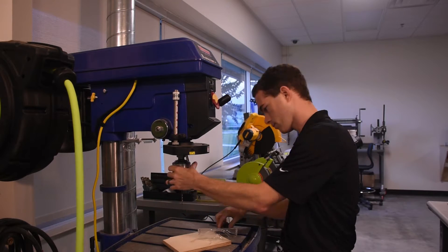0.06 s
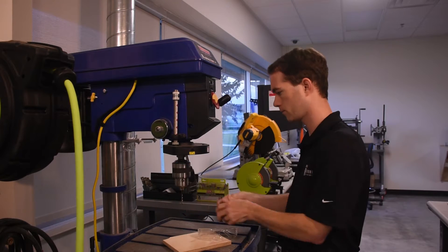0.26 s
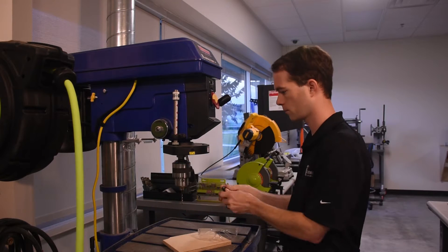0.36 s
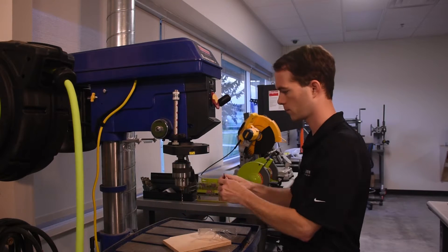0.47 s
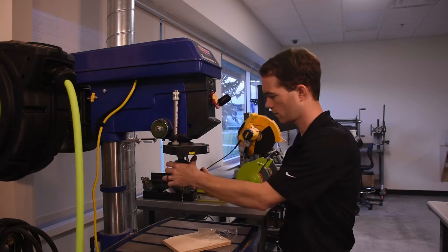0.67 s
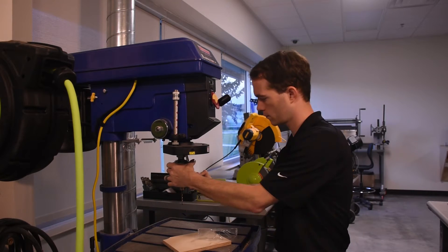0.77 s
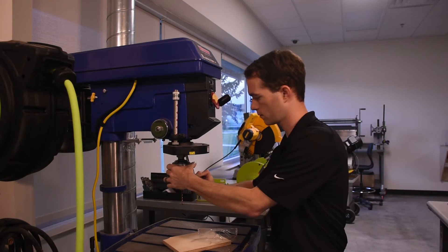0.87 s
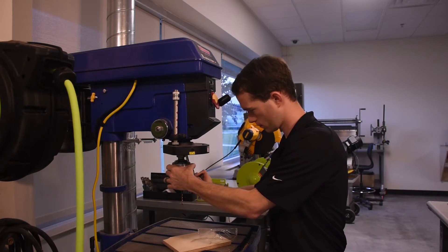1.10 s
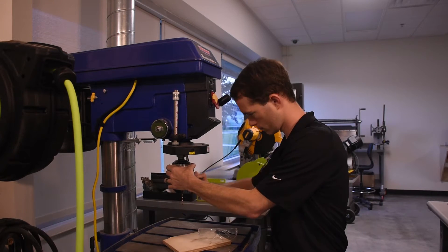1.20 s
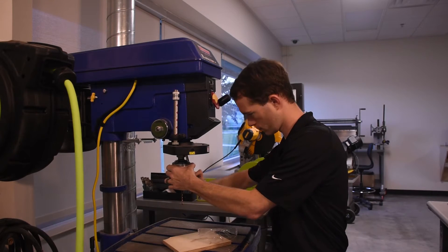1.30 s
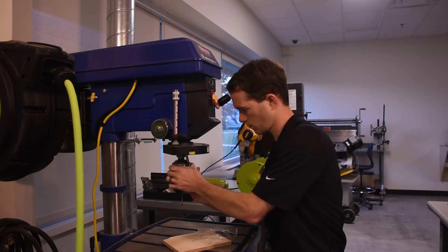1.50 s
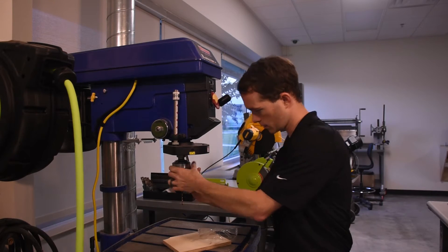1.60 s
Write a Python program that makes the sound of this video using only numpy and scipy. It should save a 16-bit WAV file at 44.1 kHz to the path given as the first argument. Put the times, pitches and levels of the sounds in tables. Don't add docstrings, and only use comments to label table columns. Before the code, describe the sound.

A steel key works in a drill press chuck. Soft finger rubbing near 0.1 s leads to two bright clanks at 0.13 and 0.15 s, chattering until damped around 0.25 s. Faint handling follows, a small knock at 0.72 s and dull slips near 0.9 s. Sharp ratcheting tooth knocks ring the heavy chuck at 1.18, 1.23, 1.29 and 1.32 s, then a dull knock at 1.53 s over quiet room hiss.

```python
import sys
import numpy as np
from scipy import signal
from scipy.io import wavfile

SR = 44100
rng = np.random.default_rng(int(sys.argv[2]) if len(sys.argv) > 2 else 0)


def amplitude_ratio(level_db):
    exponent = np.asarray(level_db, float) / 20
    return 10 ** exponent


def pcm_store(signal):
    levels = np.round(np.clip(np.atleast_2d(signal), -1, 1) * 32767)
    wavfile.write(sys.argv[1], SR, levels.astype(np.int16).T)


N = 72765

EDGES = 30 * 2 ** np.arange(0, 9.3, 1 / 3)
# pitch_hz [Hz], density_db [dB per Hz]
TOOTH_CRACK = [(180, -62), (300, -16.5), (1660, -1), (7020, -14), (8580, -13.5), (9810, -8), (11000, -16),
               (15200, -10), (16500, -20)]
# crack_t60 [s at 2 kHz], shortening [power of pitch], tail_db [dB], tail_t60 [s],
# tail_shortening [power], snap_db [dB], build_up [s], ring_db [dB]
TOOTH_DECAY = (0.0273, 0.71, -17.5, 0.2468, 0.87, 8.5, -0.24, -14)


def at_hz(points, hz):
    points_hz, points_db = np.transpose(points)
    return np.interp(np.log(hz), np.log(points_hz), points_db)


def band(x, low, high):
    return signal.sosfilt(signal.butter(2, [low, high], "band", fs=SR, output="sos"), x)


def high_pass(x, order, hz):
    return signal.sosfilt(signal.butter(order, hz, "high", fs=SR, output="sos"), x)


def fade(x, t60):
    return signal.lfilter([1], [1, -amplitude_ratio(-60 / (t60 * SR))], x + 1e-18)


def ring(x, hz, t60):
    radius = amplitude_ratio(-60 / (t60 * SR))
    angle = 2 * np.pi * hz / SR
    return signal.lfilter([0, np.sin(angle)], [1, -2 * radius * np.cos(angle), radius * radius], x)


def clicks(start_s, level_db):
    out = np.zeros(N)
    np.add.at(out, (np.asarray(start_s) * SR).astype(int), amplitude_ratio(level_db))
    return out


def strike(events, crack, modes, decay):
    start_s, level_db, tilt_db, ring_db = np.transpose(events)
    t60, power, tail_db, tail_t60, tail_power, snap_db, build_s, body_db = decay
    white = rng.standard_normal((2, N))
    out = np.zeros(N)
    low, high = EDGES[9:-1], EDGES[10:]
    centre_hz = np.sqrt(low * high)
    colour_db = at_hz(crack, centre_hz)
    colour_db = colour_db - 10 * np.log10(np.sum(amplitude_ratio(2 * colour_db) * (high - low)) * 2 / SR)
    for k, hz in enumerate(centre_hz):
        brightness_db = tilt_db * np.log2(max(hz, 900) / 2000)
        hits = clicks(start_s, level_db - 10.0 + colour_db[k] + brightness_db)
        body = fade(hits, t60 * (hz / 2000) ** -power)
        tail = amplitude_ratio(tail_db) * fade(hits, tail_t60 * (hz / 2000) ** -tail_power)
        snap = amplitude_ratio(snap_db) * hits * (-1) ** (k // 2)
        out += band(white[k % 2] * (body + tail) + snap, low[k], high[k])

    luck_db = rng.normal(0, 1.67, (len(start_s), len(modes)))
    for k, (hz, mode_db, ring_t60, *own_build) in enumerate(modes):
        rise_s = max(own_build[-1] if own_build else build_s, .001)
        touch = clicks(start_s, level_db + ring_db + body_db + mode_db + luck_db[:, k]) + 1e-18
        swell = ring(ring(touch, hz, rise_s), hz, ring_t60)
        out += swell * 2 * np.log(1000) / (rise_s * SR)
    return out


def run_of(curve, per_s, crack_db, tilt_db, ring_db, count):
    curve_s, curve_db = np.transpose(curve)
    start_s = np.cumsum(rng.exponential(1 / per_s, count)) + curve_s[0]
    start_s = np.clip(start_s, 0, (N - 1) / SR)
    luck_db = 3 * rng.normal(0, 1, count)
    level_db = np.interp(start_s, curve_s, curve_db, right=curve_db[-1] - 20) + crack_db + luck_db
    return np.c_[start_s, level_db, np.full(count, tilt_db), np.full(count, ring_db)]


def shop():
    # pitch_hz [Hz], level_db [dB]
    air_colour = [(59, -60), (100, -30.5), (230, -19), (338, -0.5), (552, 2), (642, -13), (1790, -22.5),
                  (3540, -16), (14500, -19.5), (16500, -20)]
    air_db, tone_db = -68, -79
    white = rng.standard_normal((2, N))
    air = np.zeros(N)
    for k, (low, high) in enumerate(zip(EDGES, EDGES[1:])):
        air += amplitude_ratio(at_hz(air_colour, np.sqrt(low * high))) * band(white[k % 2], low, high)
    air = signal.sosfilt(signal.cheby2(10, 30, 16000, fs=SR, output="sos"), air)
    tone = ring(white[0], hz=763, t60=.25)
    return amplitude_ratio(air_db) * air / air.std() + amplitude_ratio(tone_db) * tone / tone.std()


def hand_grip():
    # start_s [s], level_db [peak dB], brightness_db [dB per octave], ring_db [dB]
    releases = [(.0414, -50, 5.5, -3), (.0598, -62, 3, 5), (.0676, -41, -4, 7), (.0763, -40, 1, -1),
                (.0838, -39, -2, 1.5), (.0858, -36.5, -0.5, 4), (.0872, -52, 3, -10), (.0958, -42.5, 2, 2),
                (.0988, -53.5, 2, 17), (.4, -56.5, 7.5, -10), (.511, -49.5, 1.5, 0), (.539, -54, -5, 7.5),
                (.549, -52, -10, 3), (.567, -54, -1, 4.5), (.588, -52, -6, -7), (.598, -56, -1, 4)]
    # start_s [s], level_db [dB]
    rubbing = [
        (.082, -63),
        (.088, -41),
        (.105, -41.5),
        (.128, -49),
    ]
    # pitch_hz [Hz], level_db [dB], t60 [s]
    hand_modes = [(480, -1, 0.0073), (803, 5.5, 0.007), (1410, 0, 0.003), (3000, -7.5, 0.0063),
                  (4800, -9, 0.0066)]
    # pitch_hz [Hz], density_db [dB per Hz]
    touch_crack = [(250, -28), (450, -22), (850, 0), (1800, -5), (3000, -5.5), (4700, -5.5), (6500, -38),
                   (16500, -20)]
    touch_decay = (0.008, 0.2, -28, 0.05, 0.1, 10, 0.001, -6)
    rubs = run_of(rubbing, per_s=500, crack_db=-5.5, tilt_db=.5, ring_db=-18., count=40)
    return strike(np.r_[releases, rubs], touch_crack, hand_modes, touch_decay)


def contact_pings():
    # start_s [s], pitch_hz [Hz], level_db [peak dB], t60 [s]
    ping_rows = [(.0415, 3000, -55, 0.0073), (.0878, 324, -32, 0.041), (.0881, 628, -45.5, 0.063),
                 (.045, 600, -55, 0.025), (.1336, 15100, -17, 0.03), (.1335, 3450, -26, 0.042),
                 (.1335, 2620, -36, .035), (.1335, 1345, -32.5, 0.045), (.1523, 15500, -23, .022),
                 (.1522, 5150, -26, 0.066), (.1522, 11260, -35, 0.052), (.2142, 5150, -39.5, 0.048),
                 (.2142, 3420, -37, 0.066), (.2142, 8140, -42, 0.036), (.252, 1010, -50.5, 0.054),
                 (.252, 4000, -52, 0.083), (.7125, 1335, -45.5, 0.026), (.714, 3970, -54, 0.018),
                 (.7235, 2350, -51, 0.091), (.7245, 1872, -39, 0.037), (.739, 1698, -57, 0.36),
                 (.745, 2396, -56, 0.22), (1.153, 803, -46.5, 0.077), (1.138, 1910, -56, 0.013),
                 (1.138, 3870, -40, 0.017), (1.138, 14500, -33, .008), (1.179, 1910, -25, 0.031),
                 (1.179, 10000, -27, 0.0086), (1.179, 6110, -29, 0.0066), (1.179, 1100, -63, 0.11),
                 (1.231, 1354, -26.5, 0.033), (1.231, 9970, -22, .012), (1.231, 14800, -17.5, .012),
                 (1.233, 2116, -36.5, 0.057), (1.2855, 1280, -34.5, 0.034), (1.29, 9900, -37, 0.0063),
                 (1.3245, 1878, -30, 0.038), (1.3245, 2310, -23, 0.021), (1.3245, 2970, -30.5, 0.027),
                 (1.33, 618.4, -33.5, .15), (1.345, 889, -45.5, 0.26), (1.36, 2020, -60, 0.35),
                 (1.562, 534, -52.5, 0.23), (1.575, 517, -53.5, 0.21), (.735, 790, -45, 0.17),
                 (.95, 1370, -51, 0.057), (.16, 3090, -32.5, 0.12), (.163, 2734, -30.5, 0.062),
                 (1.534, 1854, -46, .03), (1.534, 3270, -48, 0.022), (1.345, 2376, -50, 0.22)]
    out = np.zeros(N)
    for start_s, hz, level_db, t60 in ping_rows:
        touch = clicks([start_s], level_db - 4.5) + 1e-18
        detune_hz = 111 * (hz / 1e4) ** 2
        out += ring(touch, hz - detune_hz, t60) + ring(touch, hz + detune_hz, t60)
    return out


def column(knocks):
    middle_hz, split_hz, t60, column_db = 530.3, 5.3, 0.39, -20.5
    start_s, level_db, _, ring_db = np.transpose(knocks)
    touch = clicks(start_s, level_db + ring_db + column_db) + 1e-18
    upper = ring(touch, middle_hz + split_hz / 2, t60)
    lower = ring(touch, middle_hz - split_hz / 2, t60 * 0.68)
    return upper - lower


def pinion():
    # start_s [s], level_db [peak dB], brightness_db [dB per octave], ring_db [dB]
    slips = [
        (.886, -42.5, -1.3, -7.5),
        (.914, -45, -5.5, 4),
        (.94, -55, -9, 10),
        (.95, -62, 2, 8),
        (1.035, -64, -8, 6),
        (1.075, -53.5, -10, 9.5),
    ]
    # start_s [s], level_db [dB]
    fumble = [(.002, -72), (.25, -61.5), (.33, -72.5), (.45, -82.5), (.69, -75.5), (.78, -65.5),
              (.85, -67.5), (.955, -74), (.99, -105), (1.12, -71), (1.36, -68), (1.48, -83.5),
              (1.53, -60.5), (1.6, -96)]
    # pitch_hz [Hz], level_db [dB], t60 [s]
    pinion_modes = [(1240, -9, 0.134), (1323, -4, 0.11), (1425, 8, 0.045), (1507, 3, 0.085),
                    (1783, -5.5, 0.081), (3040, -18, 0.034)]
    shifts = run_of(fumble, per_s=700, crack_db=-3.6, tilt_db=-2.5, ring_db=-9., count=1150)
    return strike(np.r_[slips, shifts], TOOTH_CRACK, pinion_modes, TOOTH_DECAY)


def key():
    # start_s [s], level_db [peak dB], brightness_db [dB per octave], ring_db [dB]
    clanks = [
        (.1268, -41.5, 3.5, 0),
        (.1333, -11, -0.5, -3),
        (.1521, -16.5, 3, -2),
    ]
    # start_s [s], level_db [dB]
    chatter = [(.158, -27.5), (.172, -37.5), (.185, -53), (.2, -44), (.21, -30), (.225, -31.5), (.235, -52),
               (.25, -54), (.262, -53), (.275, -64.5), (.34, -63)]
    # pitch_hz [Hz], level_db [dB], t60 [s]
    key_modes = [(1057, -15, 0.11), (1587, -5.5, 0.2), (1778, -10, 0.096), (2017, -8.5, .08),
                 (2440, -12.5, 0.078), (2740, -4.5, .1), (2775, -6, 0.099), (3090, -9, 0.11),
                 (3360, -10, 0.057), (3607, -16.5, 0.15), (4290, -20, 0.18), (5250, -12.5, 0.078),
                 (6460, -22, .03), (5520, -13, .04)]
    # pitch_hz [Hz], density_db [dB per Hz]
    clank_crack = [(300, -44), (800, -21), (1150, -8), (2700, -2), (4610, -8), (5280, -3.5), (9650, -12.5),
                   (14000, -9), (15400, -7), (16500, -12)]
    clank_decay = (0.06, 0.5, -18, 0.1536, 0.2, -17, 0.18, -10.5)
    held_s, damping_db_per_s = 0.24, 250
    rattles = run_of(chatter, per_s=600, crack_db=-10.5, tilt_db=-3, ring_db=11, count=130)
    out = strike(np.r_[clanks, rattles], clank_crack, key_modes, clank_decay)
    out = high_pass(out, 2, 820)
    return out * amplitude_ratio(-damping_db_per_s * np.maximum(np.arange(N) / SR - held_s, 0))


def chuck():
    # start_s [s], level_db [peak dB], brightness_db [dB per octave], ring_db [dB]
    knocks = [(.714, -42, 2.5, 0), (.723, -33, -2.5, 0.5), (.74, -46.5, -7, 2.5), (.832, -50.5, 6, 6.5),
              (1.021, -49.5, 5, 2), (1.138, -30, 3, -9), (1.177, -57, 7, -33), (1.179, -15, 1.6, -5.5),
              (1.2235, -30, -0.5, -2), (1.227, -43, 3, 1), (1.231, -16, 2.5, -2), (1.285, -23.5, -2.5, 4.5),
              (1.29, -35.5, 4, -2), (1.3245, -18, 2.3, -3), (1.519, -42, -4, -14), (1.534, -31.5, -9.5, 1),
              (1.552, -50.5, -17, -3), (1.642, -51.5, 4, -16)]
    # start_s [s], level_db [peak dB], brightness_db [dB per octave], ring_db [dB]
    ticks = [(.38, -58.5, 7, -15), (0.593, -70, 11, 2), (0.77, -71, 5., -18), (0.918, -63.5, 10, 22),
             (1.102, -68, 3, -12), (1.113, -56, -6, 10.5), (1.162, -55, 2, -4), (0.739, -61, 7.5, 9),
             (1.544, -65.5, 9.5, -6), (1.236, -28, -1.5, -4), (1.242, -35, 1, -20), (1.249, -51, 3, -20),
             (1.33, -43, 0.5, -16), (1.337, -44, 6, -25)]
    # pitch_hz [Hz], level_db [dB], t60 [s], build_up [s]
    chuck_modes = [(730.4, -5, 0.097, 0.019), (623, -3, 0.22, 0.032), (799.6, 1, 0.12, 0.054),
                   (892.4, -13.5, 0.36, 0.089), (1111.4, -12, 0.13, 0.026), (1256, -8, 0.16, 0.032),
                   (1500, -26, 0.015, 0.0059), (1662, -11, 0.12, 0.053), (1871, -4.5, 0.11, 0.015),
                   (2160, -15.5, 0.13, 0.014), (2147, -14, 0.14, 0.015), (2500, -17, 0.063, 0.007),
                   (3250, -24.5, 0.25, 0.0084), (3900, -19, 0.14, 0.0092)]
    return strike(np.r_[knocks, ticks], TOOTH_CRACK, chuck_modes, TOOTH_DECAY) + column(knocks)


def scene():
    pings = contact_pings()
    metal = hand_grip() + pings + pinion() + key() + chuck()
    return (high_pass(metal, 4, 450) + amplitude_ratio(-26) * pings + shop())[None]


def low_pass(x):
    return signal.sosfilt(signal.butter(12, 17120, fs=SR, output="sos"), x)


def record(dry):
    top_cut = signal.cheby2(12, 50, 16750, fs=SR, output="sos")
    return low_pass(signal.sosfilt(top_cut, dry))


dry = scene()
out = record(dry)
pcm_store(out)
```